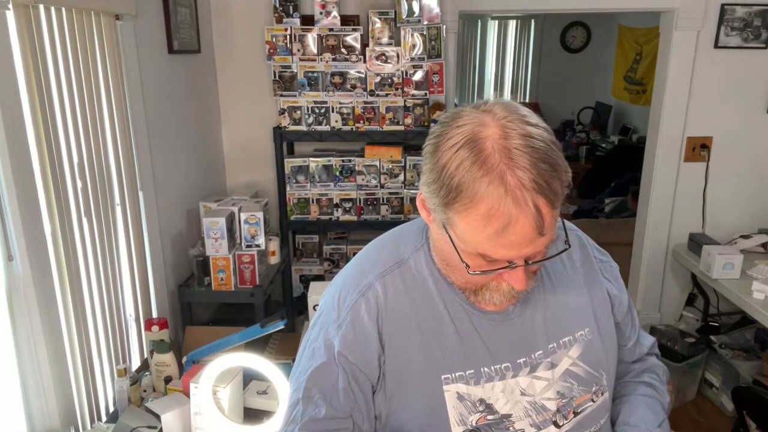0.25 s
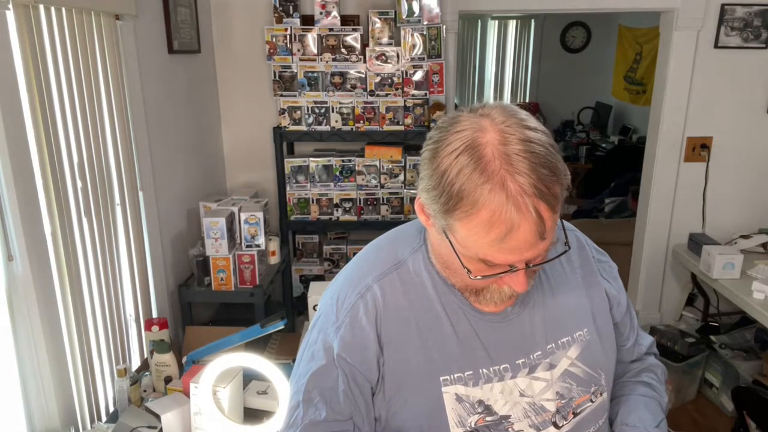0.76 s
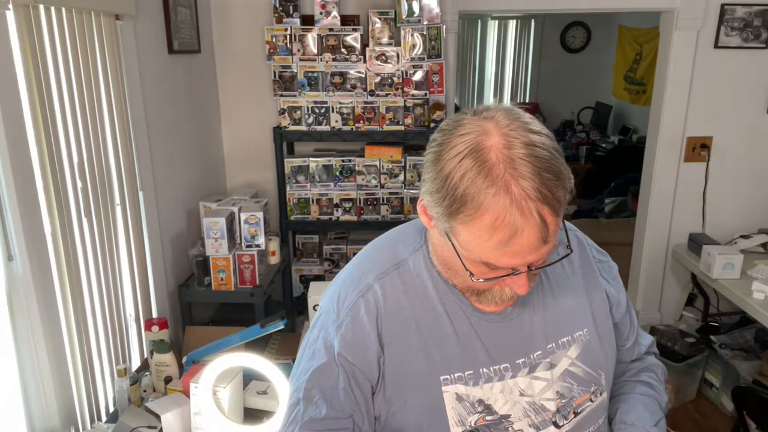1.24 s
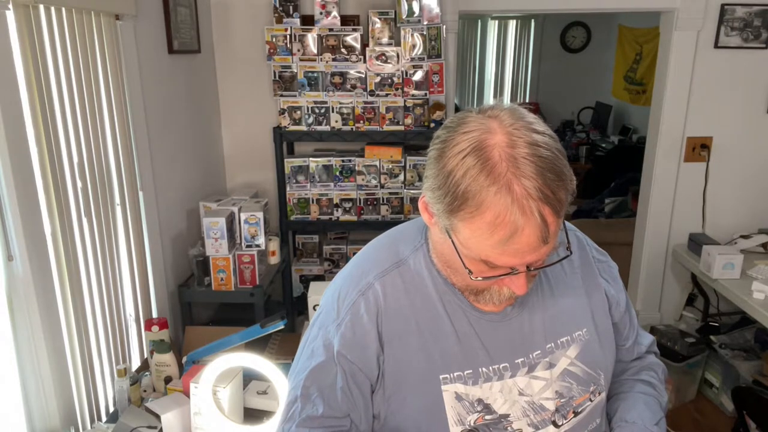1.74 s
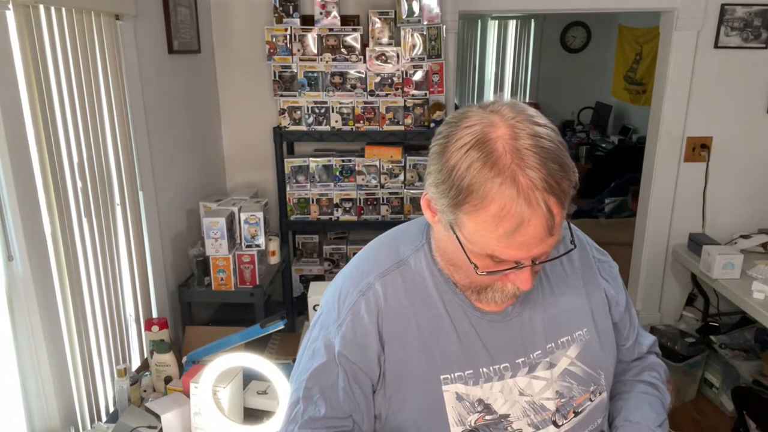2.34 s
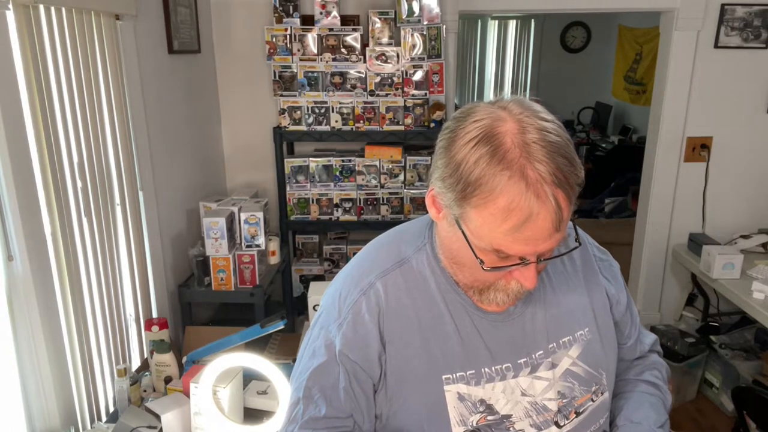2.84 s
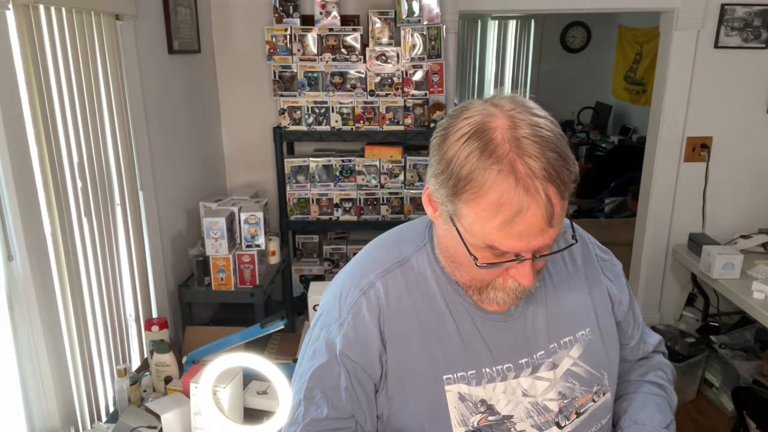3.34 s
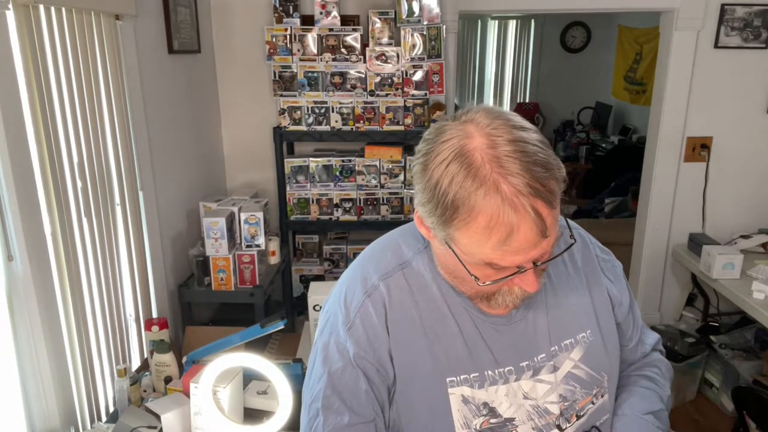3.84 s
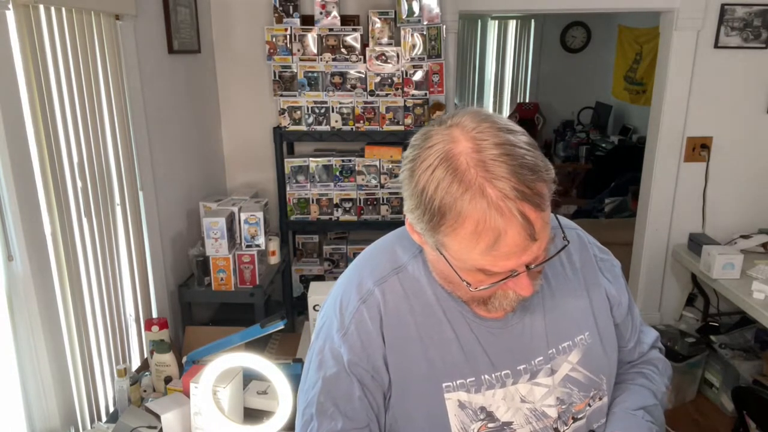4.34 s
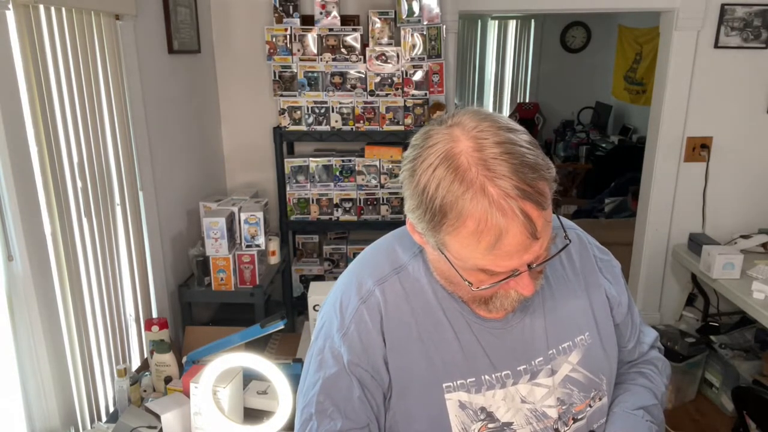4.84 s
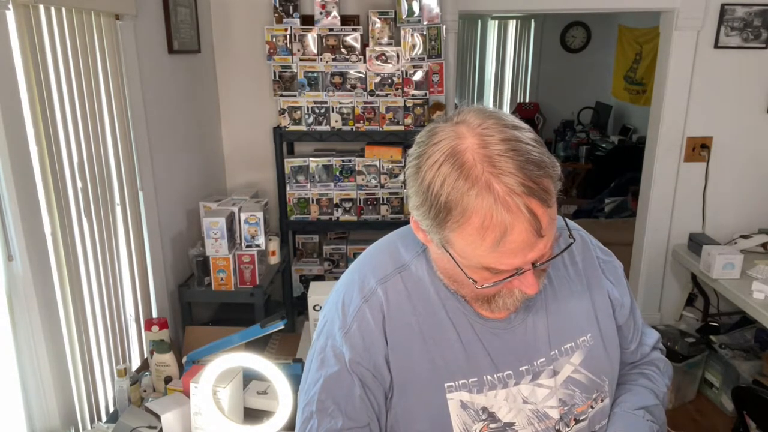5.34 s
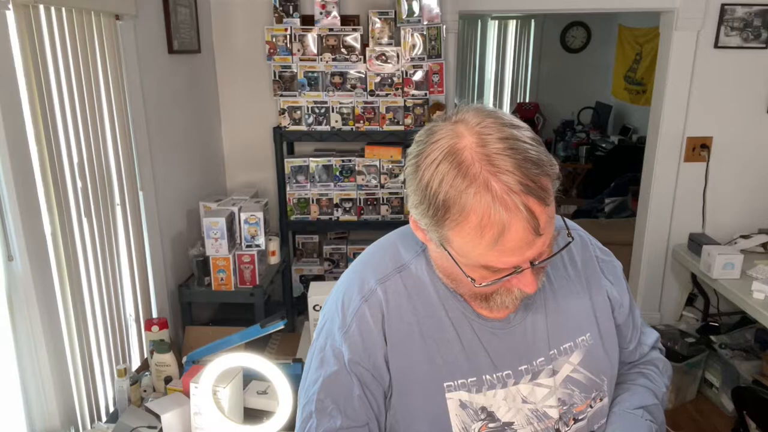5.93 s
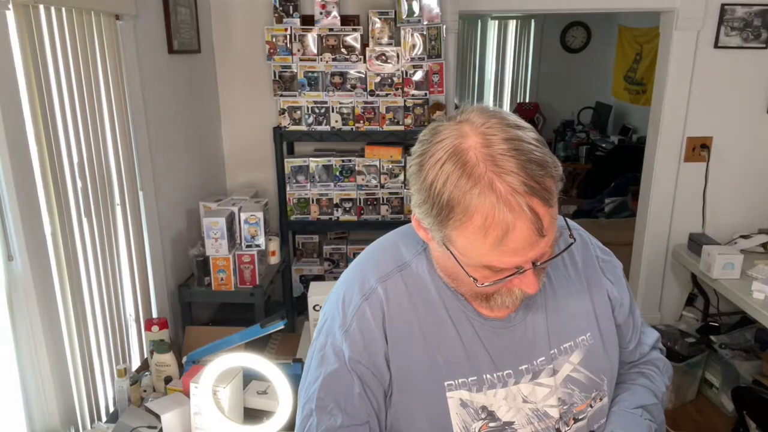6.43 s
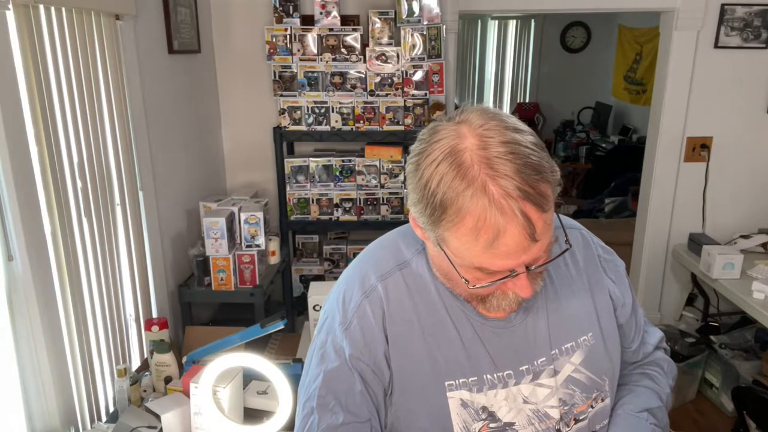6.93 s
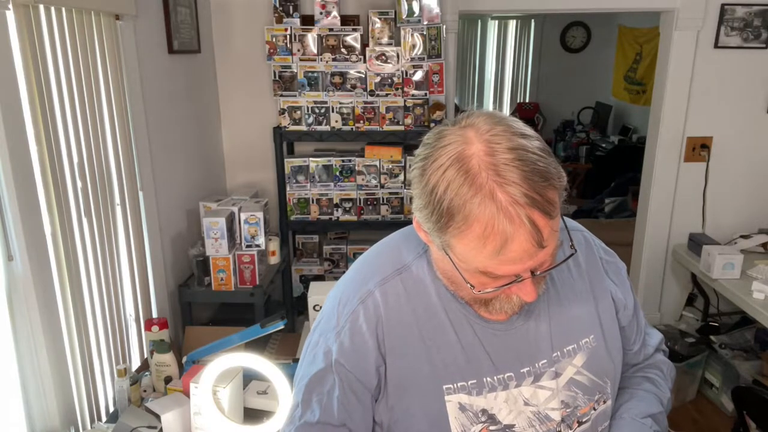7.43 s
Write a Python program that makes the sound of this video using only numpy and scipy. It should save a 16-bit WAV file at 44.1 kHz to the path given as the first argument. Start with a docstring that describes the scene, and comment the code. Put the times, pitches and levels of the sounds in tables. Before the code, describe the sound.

A quiet small room with faint air, low desk rumble and a wavering low hum, set slightly left. Hands work close by, slightly right. At 0.4 s a hard plastic part clacks on the desk, with faint taps around it and a softer contact at 0.9. A sharper, stronger clack with small rebounds comes at 1.3. Soft rubs, light clacks and brief hollow tones follow at 1.7 and 1.9, a short juddering skid at 2.1, and a double clack near 2.4. At 2.8 a hollow case lands edge first, then flat: a boxy, rattling knock, by far the loudest event, followed by a soft rub. Dull finger taps cluster at 3.6-3.8 with rubbing and sleeve rustle, then a crisp click at 4.1. From 4.8 to 6.5 light taps and clicks come irregularly, one clearer at 5.1. Rubs, faint scrapes and tiny catches end it by 7.5 as the hum fades.

```python
"""A wavering hum and soft desk rumble under faint ticks, taps and rubs; then parts clack on a desk.
One lands with a hollow knock; later fingers mostly tap, click and rub a small plastic gadget.
Hits: shaped contact force through damped modes, then direct sound, desk scatter and a small room's tail.
Rubs and sleeves: coloured noise under stroke envelopes. Air, rumble and hum: filtered noise.
The hands sit a little right of the microphones, the background a little left."""
import sys
import numpy as np
from scipy import signal
from scipy.fft import rfft, irfft, next_fast_len
from scipy.io import wavfile
from scipy.ndimage import map_coordinates

SR = 44100
rng = np.random.default_rng(int(sys.argv[2]) if len(sys.argv) > 2 else 0)


def bounce(signal):
    """Save signal as a 16-bit WAV file at the path given by the first command-line argument."""
    frames = np.transpose(np.atleast_2d(signal))
    limited = np.clip(frames, -1, 1)
    pcm = np.round(limited * 32767).astype(np.int16)
    wavfile.write(sys.argv[1], SR, pcm)


N = 338688
T_S = np.arange(SR // 3) / SR  # time within one hit
F_HZ = np.fft.rfftfreq(len(T_S), 1 / SR)  # frequency bins of one hit

# Levels are relative: each source adds its own gain, the scene its pan.
# Parts put on the desk: (time [s], knock [dB], thud, snap, tick [dB re knock], ring [Hz], ring gain [dB])
CLACKS = [(0.438, -32, 0.5, -1, -8.5, 1160, 2), (0.443, -32.5, -2.5, -2, -1.5, 655, 2.1),
          (0.464, -52, 8, -11, -2, 1070, 2.2), (0.488, -54, -2, -7, -27, 510, 3),
          (0.888, -45, 2, 1, -5, 530, 1.9), (1.327, -46.5, -10, 2.5, -22.5, 1350, 6),
          (1.338, -24, 2.5, 1.5, 0, 1120, 3.4), (1.341, -27.5, 1, -9, -1, 320, 4.5),
          (1.358, -40.5, -3, -13, -5, 545, 2.8), (1.729, -43, 8.5, -3.5, -3.5, 326, 1.4),
          (1.917, -50, 4, 0.5, -1, 709, 5), (2.358, -40, 2.5, -12, -22, 1230, 6),
          (2.368, -37.5, 5, 3.5, -3.5, 510, 1.8), (2.379, -46, -5, -8, -24, 1250, 3.1),
          (3.361, -42, -2.5, -2, -7.5, 980, 3.5)]
# Part skidding: (time [s], knock [dB], thud, snap, tick [dB re knock], ring [Hz], ring gain [dB])
SKIDS = [(2.138, -51, 7.3, -1.3, -9.5, 462, 6.3)]
# Plastic edges scraping: (time [s], knock [dB], thud, snap, tick [dB re knock], ring [Hz], ring gain [dB])
SCRAPES = [(1.64, -63.5, 5, -4.5, -2, 557, 0.045), (6.566, -58, -3, -9.5, -26.5, 1120, -0.75),
           (7.066, -64, -30.5, 4.5, -2, 785, -1.1)]
# Bands of thud, knock, snap and tick: (low edge [Hz], high edge [Hz])
BANDS_HZ = [(250, 550), (680, 1500), (2100, 4400), (5800, 13000)]
# Hollow case, down on an edge, then flat: (time [s], level [dB], tilt above 1 kHz [dB/octave])
CASE_BLOWS = [(2.7765, 2, 2), (2.786, 20.3, 0)]
# Fingers tapping the shell: (time [s], knock [dB], hardness as snap [dB re knock], pitch [Hz])
TAPS = [(0.216, -45, -17.5, 1240), (0.61, -52.5, -17.5, 740), (0.739, -60.5, -16, 620),
        (0.964, -52.5, -7, 776), (1.083, -54.5, -11, 1300), (1.131, -47, -4, 940), (1.883, -60, -16, 800),
        (1.998, -69.5, 14.5, 880), (2.052, -69, -22, 1000), (2.341, -60, -12, 1290),
        (3.299, -61, -7.5, 1080), (3.589, -38.5, -20, 1050), (3.661, -36, -23, 1040),
        (3.754, -42, -18, 970), (3.762, -41.5, -8.5, 970), (4.0, -49.5, -8, 650), (4.026, -54.5, -2, 640),
        (4.055, -52, -8, 796), (4.09, -63.5, 1, 650), (4.113, -75, 11, 1100), (4.122, -42.5, 3, 1020),
        (4.78, -51, 0, 1170), (4.857, -49, -6.5, 1190), (4.9, -54.5, -6.5, 1170), (5.037, -55, -21, 1128),
        (5.076, -51, -8, 1160), (5.084, -42, -3.5, 1432), (5.455, -57.5, -20, 1004),
        (5.493, -53.5, -18, 956), (5.75, -54.5, -7, 1186), (5.928, -60, -5, 1075), (6.095, -58, -5, 1146),
        (6.134, -56.5, -0.5, 1050), (6.161, -50.5, 1.5, 950), (6.262, -56.5, -30, 1000),
        (6.339, -57.5, -7, 664), (6.523, -52, -15.5, 1210)]
# Small catches: (time [s], tick level [dB])
CATCHES = [(0.076, -89), (0.254, -75), (0.667, -68.5), (3.334, -63), (4.643, -60), (5.689, -61),
           (7.133, -55.5), (7.549, -65)]
# Spectrum of a catch: (thud, knock, snap [dB re tick])
CATCH_SHARES_DB = (-13, -17, -6)
# Air ringing in a hollow as a part closes on it: (time [s], level [dB], pitch [Hz], glide [Hz/s])
HOLLOWS = [(1.731, -42, 740, 313), (1.918, -44.5, 721, -700)]
# Noise swells: rubs on plastic, but at 4.119 s a brief bright swell just before a click:
# (mid time [s], length [s], level [dB], body, rasp [dB re level])
NOISE_SWELLS = [(0.185, 0.16, -69, -1, -28), (0.249, 0.067, -64.5, -20, -2), (0.426, 0.044, -85, -2, 27),
                (0.655, 0.049, -75, 8, 6), (0.792, 0.16, -76, 16.5, 0), (1.315, 0.087, -64, 11.5, 8.5),
                (1.68, 0.14, -62.5, 10.5, 2), (2.518, 0.085, -65.5, 15, -4.5),
                (2.649, 0.096, -77.5, 20.5, 2), (2.723, 0.099, -63, 12, -4),
                (2.975, 0.17, -57, -10.5, -5.5), (3.68, 0.33, -63, -1.5, 1), (4.044, 0.37, -73, 12, 4),
                (4.119, 0.02, -72, -3.5, 26), (4.354, 0.13, -72.5, -2, 9), (4.89, 0.27, -65.5, -7, 2),
                (5.352, 0.075, -62, -5.5, -13.5), (5.487, 0.036, -67, 1, -7), (5.76, 0.027, -71.5, -4, -5),
                (6.396, 0.14, -64.5, -7, -8), (6.584, 0.25, -60, 1, 1), (6.897, 0.064, -59.5, -7.5, -6.5),
                (7.455, 0.2, -72.5, 7, 9.5)]
# Sleeves moving with the arms: (start [s], length [s], level [dB])
SWISHES = [(3.606, 0.34, -77), (3.716, 0.062, -70.5), (6.531, 0.05, -76), (7.025, 0.49, -77)]
# Arms jolting the desk: (mid time [s], length [s], level [dB])
JOLTS = [(0.03, 0.11, -57.5), (1.69, 0.27, -57), (2.18, 0.21, -52)]

# Desk resonances: (frequency [Hz], width [Hz], gain [dB])
DESK_MODES = [(266, 50, -0.5), (315, 54, 2), (377, 30, 10), (522, 61, 6.5), (682, 70, 5), (950, 38, 5.5),
              (1082.5, 55, 3.5), (1290, 60, 0.5), (1620, 110, -2), (1750, 61, -2.5), (2959, 100, 7.5),
              (3320, 67, 4), (3500, 99, 3), (3690, 42, 4.5), (4810, 65, -2), (6713, 1000, 5),
              (7500, 570, 6.5), (10900, 730, 4.5)]
# Shell resonances: (frequency [Hz], width [Hz], gain [dB])
SHELL_MODES = [(540, 28, 2), (705, 110, 8), (965, 56, 2.5), (1047, 150, 8.5), (1500, 270, -4.5),
               (2185, 95, -4.5), (2390, 180, -2.5), (3040, 220, 2.5), (3335, 190, 5), (3790, 60, 4.5),
               (4306, 120, 0), (6786, 790, -6), (7580, 360, 2.5)]
# Skidding part's resonances: (frequency [Hz], width [Hz], gain [dB])
SKID_MODES = [(182, 40, 31.5), (489, 42, 11.5), (750, 50, 6), (1340, 110, 5), (2070, 90, 7), (2710, 220, 8)]
# Hollow case's resonances: (frequency [Hz], width [Hz], gain [dB])
CASE_MODES = [(396, 25, 9), (497, 25, 5), (556, 28, 6), (680, 57, 8), (751, 26, 10.5), (866, 14, 4.5),
              (908, 18, 7), (1044, 32, 6.5), (1325, 34, 6), (1657, 77, 0.5), (2440, 250, 1)]

# Colour of the hollow blow: (frequency [Hz], gain [dB])
CASE_COLOUR = [(120, -39.5), (230, -27.5), (400, -25), (620, -5.5), (950, -4), (1350, -6), (1650, -7.5),
               (2000, -20.5), (2500, -15), (3000, -22), (6200, -24.5), (12000, -28), (16000, -35.5)]
# Skin on plastic: (frequency [Hz], gain [dB])
SKIN_COLOUR = [(150, -13.5), (380, -0.5), (700, 0.5), (1000, 2), (1230, 3), (1500, -5), (2200, -4),
               (4000, -12), (7000, -24.5), (12500, -32.5), (14000, -45.5)]
# Cloth: (frequency [Hz], gain [dB])
CLOTH_COLOUR = [(300, 1), (900, -2), (1700, -8), (3500, -7), (7000, -8.5), (12500, -16), (14000, -30.5)]
# Desk rumble: (frequency [Hz], gain [dB])
RUMBLE_COLOUR = [(20, -46), (30, -23.5), (40, 0), (65, 1), (100, -5.5), (150, -18), (260, -37.5),
                 (600, -72.5)]
# Room air: (frequency [Hz], gain [dB])
AIR_COLOUR = [(22, -30), (50, -12), (200, -10), (330, -17.5), (550, -24), (820, -26), (950, -21.5),
              (1150, -27.5), (1550, -32), (1900, -31), (2200, -27.5), (2700, -32), (3600, -34), (4700, -33),
              (5600, -38), (8000, -41), (12700, -44), (13800, -57)]
# Decay of the room: (frequency [Hz], T60 [s])
ROOM_T60 = [(150, 0.17), (500, 0.19), (1400, 0.24), (3600, .28), (9000, .26), (15000, 0.31)]
# Appliance lines: (frequency [Hz], width [Hz], level [dB])
HUM_LINES = [(58, 3.9, -82), (105, 8.9, -77.5), (114.5, 3.5, -76.5)]
# Level of the hum's highest line: (time [s], level [dB])
DRONE_LEVEL = [(0, -68), (1.001, -71), (2.201, -73.5), (3, -73.5), (3.6, -69), (4.399, -67.5), (5.8, -67.5),
               (6, -69.5), (7.6, -77.5)]

# Rebounds of a dropped part, spread over the span: level, fall with time, random spread
REBOUND_SPAN_S, REBOUND_DB, REBOUND_FALL_DB_PER_S, REBOUND_SPREAD_DB = 0.09, -5, 230, 3
CLUMPS_PER_S, CLUMP_DB = 400, 5  # unevenness of chatter
GRIP_Q, GRIP_DB = 4.2, 5  # ring sharpness at 0 dB; ring gain of taps and catches

# Loose parts inside the case take over its treble
CASE_RATTLE_DB, CASE_RATTLE_T60_S, CASE_RATTLE_HZ, CASE_REBOUND_DB = -5.5, 0.063, 2200, -9
CASE_WET_DB, CASE_EARLY_DB, CASE_EARLY_T60_S = -6, -5, 0.16

# At THUD_HZ a tap thuds as loud as it knocks; higher taps thud less
THUD_HZ, THUD_DB_PER_OCTAVE = 624.4, 20.5
TICK_DB, TICK_PER_SNAP = -7, 1.4  # tick grows faster with hardness than snap
CATCH_HZ = 910
FIDGETS_PER_S, FIDGET_DB, FIDGET_SPREAD_DB, FIDGET_HARD_DB, FIDGET_HZ = 1.2, -70, 2, -8, 1050

HOLLOW_RISE_S, HOLLOW_T60_S = 0.001, 0.16
HOLLOW_WAVER_PER_S, HOLLOW_WAVER_DB, HOLLOW_WAVER_RAD = 130, 2, 0.5

BODY_HZ, RASP_HZ = 597, 1900  # body lies below the first, rasp above the second
SLIPS_PER_S, SLIP_DB, PRESSURE_PER_S, PRESSURE_DB = 1100, 5, 70, 1.6
LEAD_IN_RISE_S, LEAD_IN_DB = 0.0046, -17.5  # noise swell into a clack: time constant, last level re knock
LANDING_S, LANDING_DB = 0.025, -36  # case grazing the desk as its edge comes down
RUB_ECHO_DB, RUB_SCATTER_DB = -3, -3
SWISH_RISE_S, SWISH_FALL_S = 0.023, 0.04  # time constants

AIR_DB, AIR_DRIFT_DB = -72, 1
RUMBLE_DB, RUMBLE_SAG_DB_PER_S = -60, 1  # rumble sinks as the work gets finer
DRONE_HZ, DRONE_WIDTH_HZ, DRONE_WAVER_DB = 227.6, 20, 2

LEFT_LAG_S = 0.000198  # the left microphone hears the hands later
ECHO_TOP_HZ, TOP_HZ = 13500, 16200


def desk_clacks():
    """Hard plastic parts hit the desk, ring its modes, chatter and rebound."""
    return strike(CLACKS, DESK_MODES, gain_db=15.5, chatter_db=7.5, chatter_t60_s=0.025, hard_hz=6807,
                  wet_db=-2.5, early_db=-2.0, early_t60_s=0.074, loose=True)


def case_knock():
    """A blunt blow rings the hollow case; its rattle carries the treble. A little louder right."""
    out = np.zeros((2, N))
    blunt = 1 / (1 + 1j * F_HZ / CASE_RATTLE_HZ)
    for time_s, level_db, tilt_db in CASE_BLOWS:
        colour_db = along(CASE_COLOUR, F_HZ) + tilt_db * np.log2(np.maximum(F_HZ / 1000, 1))
        blow = blunt * (1 + amp(CASE_REBOUND_DB) * rebounds())
        rattle = amp(CASE_RATTLE_DB) * (1 - blunt) ** 2 * chatter(CASE_RATTLE_T60_S)
        heard = paths(CASE_WET_DB, CASE_EARLY_DB, CASE_EARLY_T60_S)
        hit = (blow + rattle) * causal(colour_db) * ringing(CASE_MODES) * heard
        add(out, time_s, amp(level_db) * hit)
    return out * amp([[-0.6], [0.6]])


def shell_clicks():
    """Fingertips and small catches tap the hand-held shell and ring its modes."""
    thud_db, knock_db, snap_db = CATCH_SHARES_DB
    catches = [(time_s, tick_db + knock_db, thud_db - knock_db, snap_db - knock_db, -knock_db,
                CATCH_HZ, GRIP_DB) for time_s, tick_db in CATCHES]
    taps = [tap(*row) for row in list(TAPS) + fidgets()]
    return strike(catches + taps, SHELL_MODES, gain_db=17.0, chatter_db=-1.5, chatter_t60_s=0.026,
                  hard_hz=4836, wet_db=1.5, early_db=0.5, early_t60_s=0.02)


def tap(time_s, knock_db, hard_db, pitch_hz):
    """A fingertip's blow: lower pitch gives more thud, hardness more tick."""
    thud_db = -THUD_DB_PER_OCTAVE * np.log2(pitch_hz / THUD_HZ)
    tick_db = TICK_DB + TICK_PER_SNAP * hard_db
    return time_s, knock_db, thud_db, hard_db, tick_db, pitch_hz, GRIP_DB


def fidgets():
    """Faint taps at random moments as the fingers shift their hold."""
    chance = rng.random((int(FIDGETS_PER_S * N / SR), 2))
    return [(when * N / SR, FIDGET_DB + FIDGET_SPREAD_DB * (2 * force - 1), FIDGET_HARD_DB, FIDGET_HZ)
            for when, force in chance]


def skid():
    """A part judders across the desk: chatter outweighs the first blow."""
    return strike(SKIDS, SKID_MODES, gain_db=21.0, chatter_db=5.5, chatter_t60_s=0.025, hard_hz=2500,
                  wet_db=12.0, early_db=8.0, early_t60_s=0.022)


def scrapes():
    """An edge drags over the shell: a dense run of tiny contacts that dies away."""
    return strike(SCRAPES, SHELL_MODES, gain_db=23.5, chatter_db=2.0, chatter_t60_s=0.19, hard_hz=3870,
                  wet_db=11.5, early_db=12, early_t60_s=0.053)


def hollows():
    """Air in a plastic hollow rings briefly, bending with the gap, unsteady as the grip shifts."""
    out = np.zeros((2, N))
    for time_s, level_db, pitch_hz, glide_hz_per_s in HOLLOWS:
        swell, drift = [wobble(HOLLOW_WAVER_PER_S, size=len(T_S)) for _ in range(2)]
        decay_db = level_db - 60 * T_S / HOLLOW_T60_S + HOLLOW_WAVER_DB * swell
        envelope = (1 - np.exp(-T_S / HOLLOW_RISE_S)) * amp(decay_db)
        phase = 2 * np.pi * (pitch_hz + glide_hz_per_s * T_S / 2) * T_S + HOLLOW_WAVER_RAD * drift
        note = envelope * np.sin(phase)
        add(out, time_s, rfft(note) * paths(wet_db=-10, early_db=-14, early_t60_s=0.02))
    return out


def handling():
    """Stick-slip of skin on plastic as grainy noise strokes; a short noise swell leads into each clack."""
    now_s = np.arange(N) / SR
    lead_ins = sum(amp(db + LEAD_IN_DB) * np.exp(-abs(now_s - time_s) / LEAD_IN_RISE_S) * (now_s < time_s)
                   for time_s, db, *_ in CLACKS)
    landing = strokes([(CASE_BLOWS[0][0], LANDING_S, LANDING_DB)])

    slip_db = SLIP_DB * wobble(SLIPS_PER_S) + PRESSURE_DB * wobble(PRESSURE_PER_S)
    slips = rng.standard_normal(N) * amp(slip_db)
    grain = unit(filtered(slips, lambda hz: amp(along(SKIN_COLOUR, hz))))
    body = filtered(grain, lambda hz: 1 / (1 + (hz / BODY_HZ) ** 4))
    rasp = filtered(grain, lambda hz: 1 - 1 / (1 + (hz / RASP_HZ) ** 4))
    middle = grain - body - rasp

    mid_s, length_s, level_db, body_db, rasp_db = np.transpose(NOISE_SWELLS)
    bands = [(body, level_db + body_db), (middle, level_db), (rasp, level_db + rasp_db)]
    noise = sum(band * strokes(zip(mid_s, length_s, band_db)) for band, band_db in bands)
    noise = noise + grain * (lead_ins + landing)
    room = irfft(paths(RUB_ECHO_DB, RUB_SCATTER_DB, early_t60_s=0.02))
    room = room / np.linalg.norm(room[0])
    return amp(0.5) * signal.fftconvolve(noise[None], room, axes=1)[:, :N]


def sleeves():
    """Cloth swishes smoothly: noise rises, holds while the arm moves and dies away."""
    now_s = np.arange(N) / SR
    motion = np.zeros(N)
    for start_s, length_s, level_db in SWISHES:
        rise = 1 - np.exp(-np.maximum(now_s - start_s, 0) / SWISH_RISE_S)
        fall = np.exp(-np.maximum(now_s - start_s - length_s, 0) / SWISH_FALL_S)
        motion += amp(level_db) * rise * fall
    return amp(7.5) * motion * unit(rush(CLOTH_COLOUR) * amp(0.43 * wobble(45)))


def background():
    """Room air and desk rumble as coloured noise; appliance hum as narrow noise lines."""
    now_s = np.arange(N) / SR
    air = amp(AIR_DB + AIR_DRIFT_DB * wobble(0.72)) * rush(AIR_COLOUR)
    shaking = amp(RUMBLE_DB - RUMBLE_SAG_DB_PER_S * now_s) + strokes(JOLTS)
    rumble = amp(-3.5) * shaking * amp(1.5 * wobble(7)) * rush(RUMBLE_COLOUR)
    hum = sum(amp(level_db) * line(hz, width_hz) for hz, width_hz, level_db in HUM_LINES)
    drone_db = np.interp(now_s, *np.transpose(DRONE_LEVEL)) + DRONE_WAVER_DB * wobble(15)
    drone = amp(drone_db) * line(DRONE_HZ, DRONE_WIDTH_HZ)
    return air + rumble + hum + drone


def strike(rows, modes, gain_db, chatter_db, chatter_t60_s, hard_hz, wet_db, early_db, early_t60_s,
           loose=False):
    """Contact forces ring a body; each blow has its own band levels."""
    out = np.zeros((2, N + len(T_S)))
    # small parts radiate little bass; contact time limits the treble
    radiation = (1j * F_HZ / (190 + 1j * F_HZ)) ** 3 / (1 + 1j * F_HZ / hard_hz)
    for time_s, knock_db, thud_db, snap_db, tick_db, ring_hz, ring_db in rows:
        # surfaces graze first; the main blow seats 1.5 ms later
        main_blow = np.exp(-2j * np.pi * F_HZ * 0.0015)
        force = main_blow + amp(chatter_db) * chatter(chatter_t60_s)
        if loose:
            force = force + rebounds()
        # grip and hit spot favour one mode: the stronger, the longer it rings
        ring_width_hz = ring_hz / (GRIP_Q * amp(ring_db))
        grip = 0.5 + resonance(ring_hz, ring_width_hz, ring_db)
        hit = force * radiation * ringing(modes) * grip * paths(wet_db, early_db, early_t60_s)
        # smooth colour that gives each band its share
        power = abs(hit.mean(axis=0)) ** 2 / len(T_S)
        colour = []
        for (low_hz, high_hz), share_db in zip(BANDS_HZ, [thud_db, 0, snap_db, tick_db]):
            band_power = power[(F_HZ > low_hz) & (F_HZ < high_hz)].sum()
            lift_db = share_db - 10 * np.log10(band_power)
            colour += [(low_hz, lift_db), (high_hz, lift_db)]
        add(out, time_s, amp(knock_db + gain_db) * hit * causal(along(colour, F_HZ)))
    return out[:, :N]


def chatter(t60_s):
    """Response of unit energy: hard surfaces rattle in uneven clumps after they meet."""
    clumps = amp(CLUMP_DB * wobble(CLUMPS_PER_S, size=len(T_S)))
    envelope = amp(-60 * T_S / t60_s) * (1 - np.exp(-T_S / 0.0018))
    force = rng.standard_normal(len(T_S)) * clumps * envelope
    return rfft(force / np.linalg.norm(force))


def rebounds(count=8):
    """Response of the few small contacts after a blow, weaker with time apart from random spread."""
    when_s = REBOUND_SPAN_S * (np.arange(count) + rng.uniform(0.5, 1.5, count)) / count
    spread_db = REBOUND_SPREAD_DB * rng.standard_normal(count)
    size = amp(REBOUND_DB - REBOUND_FALL_DB_PER_S * when_s + spread_db)
    return size @ np.exp(-2j * np.pi * when_s[:, None] * F_HZ)


def resonance(hz, width_hz, gain_db):
    """Response of one damped mode."""
    damping = 1j * F_HZ * width_hz
    return amp(gain_db) * damping / (hz * hz - F_HZ * F_HZ + damping)


def ringing(modes):
    """A body's response; every blow rings its modes at new strengths."""
    return 1.0 + sum(resonance(hz, width_hz, gain_db + 2 * rng.standard_normal())
                     for hz, width_hz, gain_db in modes)


def paths(wet_db, early_db, early_t60_s, dull_hz=9000):
    """Stereo response from the hands: direct sound, desk-top scatter, room tail."""
    hz, frame_s, bins = signal.stft(diffuse(len(T_S)), SR, nperseg=256)
    bins = bins * amp(-60 * frame_s / along(ROOM_T60, hz)[:, None])
    tail = signal.istft(bins, SR, nperseg=256)[1][:, :len(T_S)]
    tail = tail * (1 - np.exp(-T_S / 0.0017))
    early = diffuse(len(T_S)) * amp(-60 * T_S / early_t60_s) * (1 - np.exp(-T_S / 0.0014))
    echoes = amp(wet_db) * tail / np.linalg.norm(tail[0])
    echoes = echoes + amp(early_db) * early / np.linalg.norm(early[0])
    # reflections are low-passed, steeply above ECHO_TOP_HZ
    low_pass = causal(-10 * np.log10(1 + (F_HZ / ECHO_TOP_HZ) ** 40)) / (1 + 1j * F_HZ / dull_hz)
    direct = np.exp(-2j * np.pi * F_HZ * np.array([[LEFT_LAG_S], [0]]))
    return direct + rfft(echoes) * low_pass


def causal(gain_db):
    """Minimum-phase response on F_HZ: starts at once, rings afterwards."""
    cepstrum = irfft(np.log(amp(gain_db)))
    fold = np.zeros(len(T_S))
    fold[0], fold[1:len(T_S) // 2] = 1, 2
    return np.exp(rfft(cepstrum * fold))


def add(out, time_s, response):
    """Add one hit, given as a response on F_HZ, faded out from 0.25 to 0.3 s."""
    fade = np.clip(6 - 20 * T_S, 0, 1)
    out[:, round(time_s * SR):][:, :len(T_S)] += irfft(response) * fade


def strokes(rows):
    """Gain per sample of cos-squared swells, from (mid time [s], length [s], level [dB])."""
    now_s, gain = np.arange(N) / SR, np.zeros(N)
    for mid_s, length_s, level_db in rows:
        span = slice(*np.searchsorted(now_s, [mid_s - length_s / 2, mid_s + length_s / 2]))
        gain[span] += amp(level_db) * np.cos(np.pi * (now_s[span] - mid_s) / length_s) ** 2
    return gain


def rush(colour):
    """Diffuse noise of rms 1 with the given colour."""
    return unit(filtered(diffuse(N), lambda hz: amp(along(colour, hz))))


def line(centre_hz, width_hz):
    """An unsteady tone of rms 1: noise through a narrow peak."""
    return unit(filtered(diffuse(N), lambda hz: 1 / (1 + (2 * (hz - centre_hz) / width_hz) ** 2)))


def diffuse(size, apart_hz=600):
    """Noise from all around: long waves reach both microphones more alike."""
    mid, side = rng.standard_normal((2, size))
    side = filtered(side, lambda hz: np.hypot(hz, apart_hz * 0.33) / np.hypot(hz, apart_hz))
    return np.array([mid + side, mid - side])


def wobble(knots_per_s, size=N):
    """A smooth random curve through normally distributed knots."""
    knots = rng.standard_normal(int(size * knots_per_s / SR) + 4)
    return map_coordinates(knots, [np.arange(size) * knots_per_s / SR])


def filtered(x, response):
    """x times a response of frequency [Hz]."""
    size = x.shape[-1]
    padded = next_fast_len(size + SR // 5)
    return irfft(rfft(x, padded) * response(np.fft.rfftfreq(padded, 1 / SR)), padded)[..., :size]


def along(points, hz):
    """Interpolate (frequency [Hz], value) points on a log axis."""
    point_hz, value = np.transpose(points)
    return np.interp(np.log(hz + 1), np.log(point_hz + 1), value)


def amp(db):
    """Amplitude factor from dB."""
    return 10 ** (np.asarray(db) / 20)


def unit(x):
    """Scale to rms 1."""
    return x / np.sqrt(np.mean(x ** 2) + 1e-20)


def scene():
    """Hands a little to the right, background a little to the left."""
    contacts = desk_clacks() + case_knock() + shell_clicks() + skid() + scrapes()
    hands = contacts + hollows() + handling() + sleeves()
    return hands * amp([[-0.3], [0.3]]) + background() * amp([[0.6], [-0.6]])


def record(dry):
    """Treble rolls off around 14.5 kHz and stops at TOP_HZ."""
    return filtered(dry, lambda hz: (hz < TOP_HZ) / np.hypot(1, (hz / 14500) ** 8))


dry = scene()
out = record(dry)
bounce(out)
```